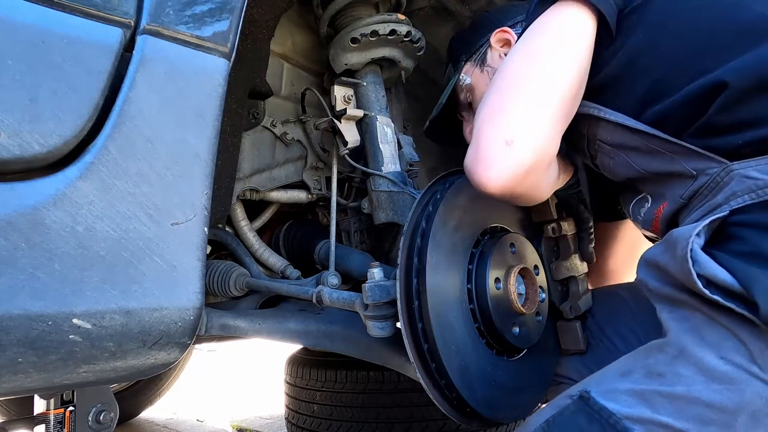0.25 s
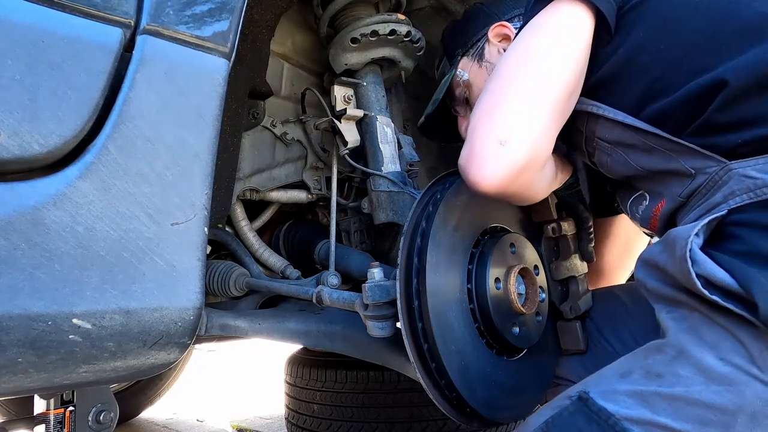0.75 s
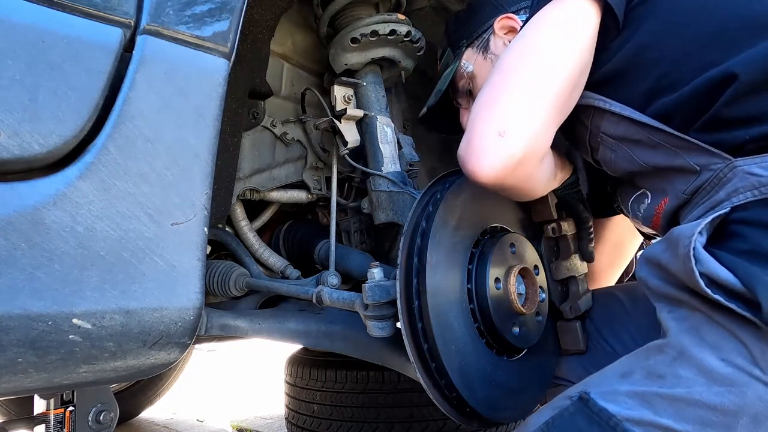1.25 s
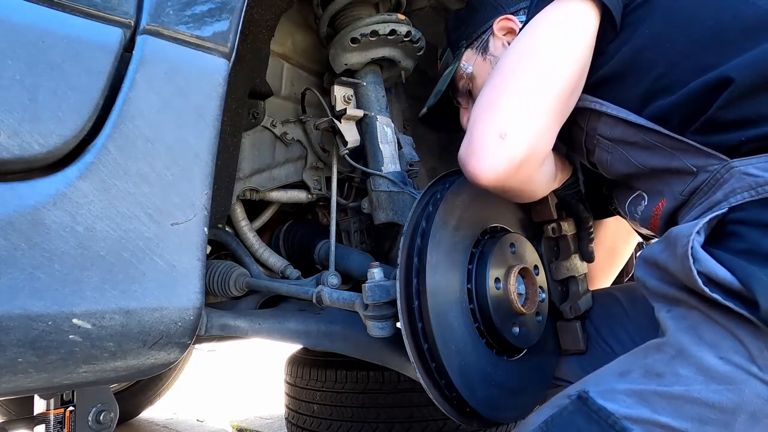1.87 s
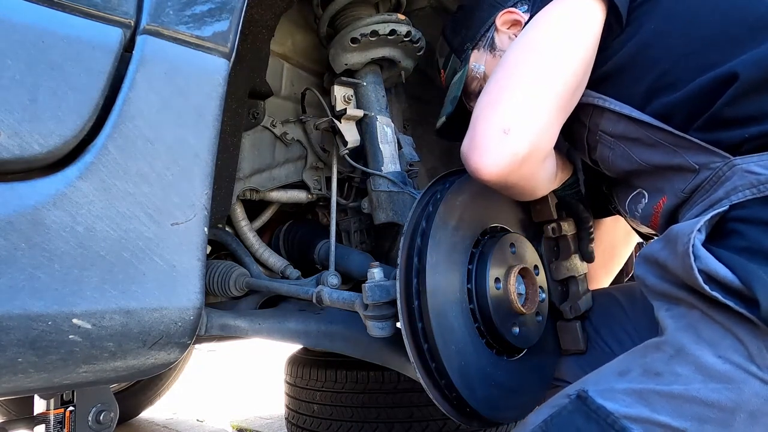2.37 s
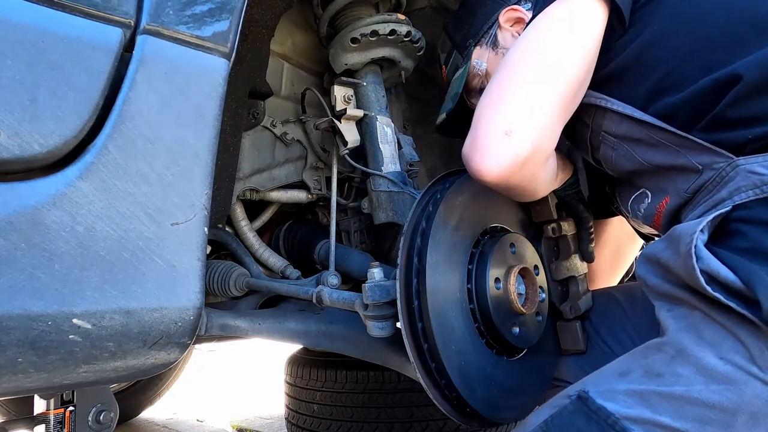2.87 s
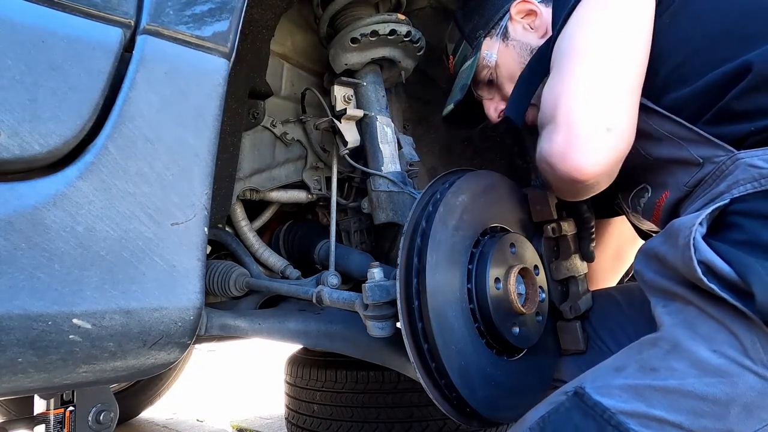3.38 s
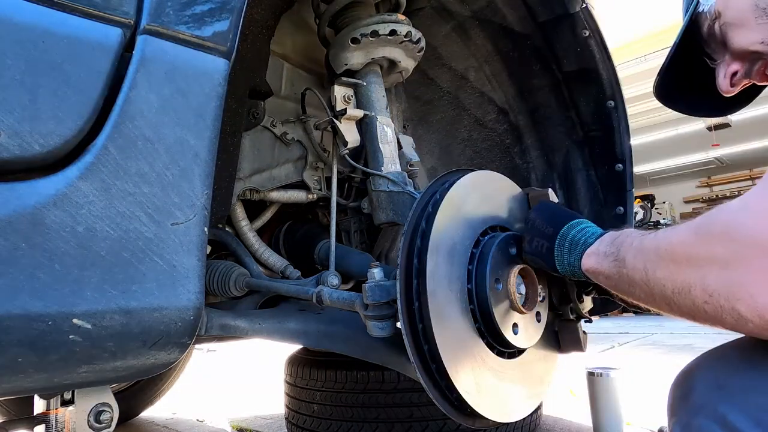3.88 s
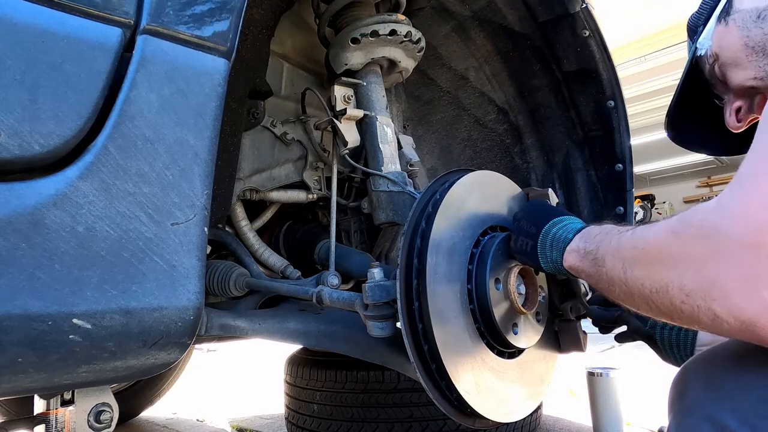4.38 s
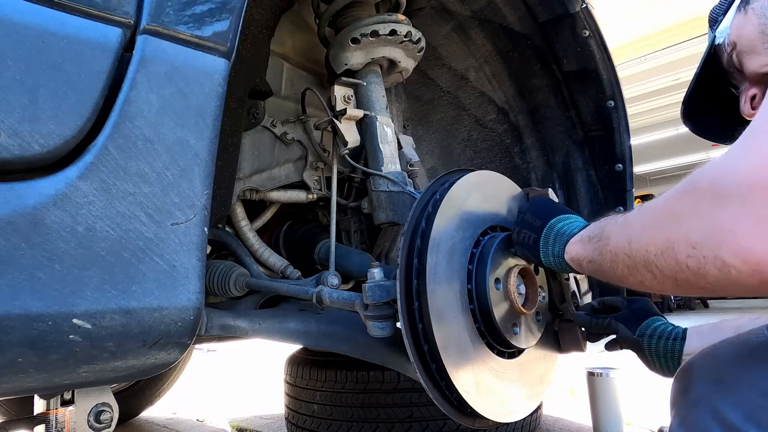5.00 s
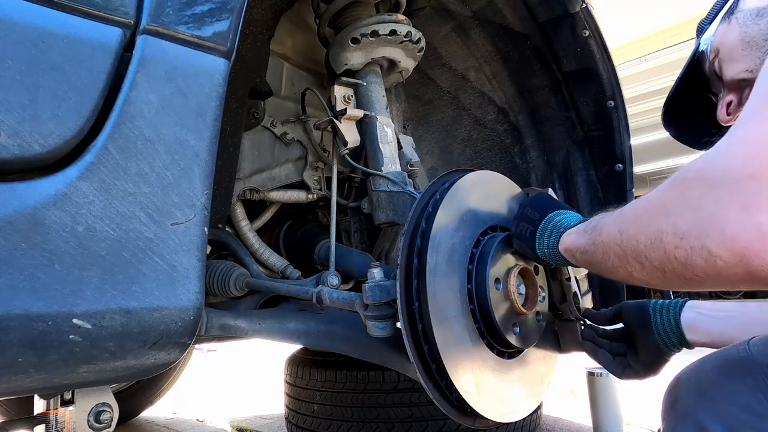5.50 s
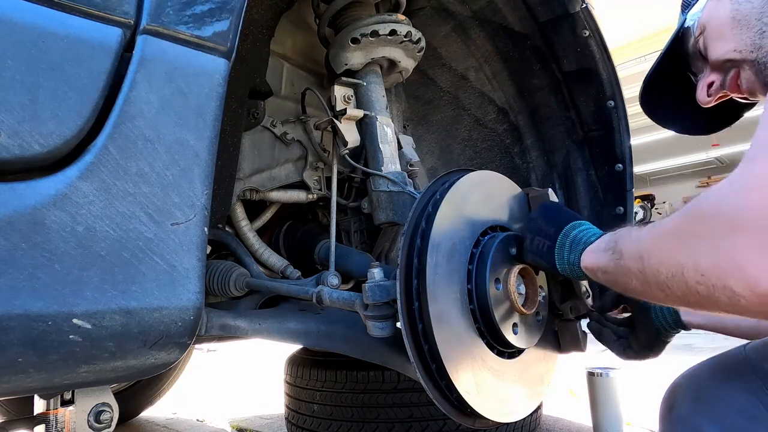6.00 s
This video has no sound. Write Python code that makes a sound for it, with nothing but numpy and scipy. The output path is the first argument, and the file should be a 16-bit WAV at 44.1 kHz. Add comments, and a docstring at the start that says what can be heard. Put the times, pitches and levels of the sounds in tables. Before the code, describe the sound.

Steel parts clink and scrape behind a car's brake rotor in a quiet garage, then a pad clicks in and a spring clip snaps.

```python
"""Work on a front brake

In an open garage steel parts scrape and clink behind a brake rotor: each contact adds a noise burst and ringing
disc and caliper modes. The scene jumps ahead: a pad clicks into its bracket and a spring clip snaps, again as
noise bursts with ringing modes beside them. Gloves rub and grit ticks, as shaped noise. Room tone, a brief drone,
a draught and a distant rush, like passing traffic that swells and recedes, are coloured noise with moving levels."""
import sys
import numpy as np
from scipy.fft import rfft, irfft, next_fast_len
from scipy.io import wavfile
from scipy.ndimage import map_coordinates

SR = 44100
rng = np.random.default_rng(int(sys.argv[2]) if len(sys.argv) > 2 else 0)


def store_pcm(level_fs):
    """Save levels as 16-bit WAV."""
    pcm = np.round(np.clip(level_fs, -1, 1) * 32767).astype(np.int16)
    wavfile.write(sys.argv[1], SR, np.atleast_2d(pcm).T)


N = 275184

# Background noise spectra: (frequency [Hz], relative density [dB])
ROOM_SPECTRUM = [(25, 0), (60, -6.5), (110, -6.5), (200, -10.5), (350, -17.5), (600, -20), (1000, -22),
                 (1600, -25), (2500, -27.5), (4000, -28.5), (7000, -31), (12500, -34.5), (16000, -35.5)]
DRONE_SPECTRUM = [(60, -58), (84, 5), (96, 0.5), (125, -25), (180, -20.5), (260, -16.5), (500, -61),
                  (1500, -74)]
DRAUGHT_SPECTRUM = [(1, -6), (2.5, 1), (7, -1), (12, -18), (20, -34), (35, -45), (80, -80), (200, -120)]
TRAFFIC_SPECTRUM = [(24, -31), (40, -4.5), (119, 1), (293, -4), (393, -9.5), (538, -6.5), (637, -6.5),
                    (854, -8), (1120, -15), (1710, -15.5), (2490, -23.5), (4470, -33), (6000, -33.5),
                    (7800, -47), (13200, -120)]
# Strength of the draught: (time [s], level [dB])
DRAUGHT_LEVEL = [(0, -31.5), (.8, -49.5), (1.2, -29.5), (2.4, -31.5), (2.7, -42), (3.8, -45), (4.5, -32),
                 (5.1, -46.5), (6.24, -42.5)]
# Sleeves and gloves rubbing: (time [s], level [dB], half length [s])
RUBS = [(0.015, -56, 0.081), (4.005, -59.5, 0.091), (4.52, -62.5, 0.061), (5.13, -56, 0.025),
        (5.45, -68.5, 0.075), (5.877, -62, 0.075)]
# Spectrum of the rubbing: (frequency [Hz], relative density [dB])
RUB_SPECTRUM = [(150, 5), (600, -3.0), (2000, -3.5), (6000, -10.5), (10000, -13.5), (16000, -23)]
# Dry ticks of gloves and grit: (time [s], nominal peak [dB], pitch [Hz])
TICKS = [(0.017, -43, 6140), (0.0637, -45.5, 4020), (4.218, -43.5, 8400), (4.442, -45, 5330),
         (4.8198, -46.5, 6660), (5.0182, -46, 6900), (5.063, -47.5, 9530), (5.1264, -33, 6330),
         (5.1617, -42.5, 5840), (5.213, -46, 10300), (5.3317, -48, 6300), (6.198, -52, 5800)]
# Pad against its bracket: (time [s], level before the pad's trim [dB], scrape-in time constant [s],
# clip ring [dB], knock [dB], edge [dB], favoured pitch [Hz])
PAD_HITS = [(3.9, -59.5, 0.001, 5, -12, -1, 4030), (3.947, -55, 0.017, -1, 1, -0.5, 2270),
            (3.985, -57, 0.014, -6, 26, 6, 3530), (4.265, -62, 0.025, -6, 0, -9, 2410),
            (4.539, -42, 0.0015, -7, 10, 0.5, 3200), (4.566, -52, 0.0056, -16, 10, -9, 1870),
            (4.67, -48, 0.0005, -3, 10, -3.5, 3250), (5.844, -44.5, 0.0013, -27, 6.5, 5.5, 9400),
            (5.881, -52.5, 0.0005, -20, 7, 4.5, 3760), (5.978, -45, 0.0012, -4.5, -1.5, -1, 2200),
            (6.077, -49, 0.007, 0, 6, 6, 5000), (6.104, -52, 0.037, -6, 11, -3, 1270),
            (6.13, -45, 0.0016, -7, 3, -6, 4500)]
# Contacts behind the rotor: (time [s], level before the rotor's trim [dB], scrape-in time constant [s],
# disc ring [dB], knock [dB], edge [dB], favoured pitch [Hz])
ROTOR_HITS = [(0.357, -34, 0.00064, -14, -2.5, -3, 1700), (0.362, -37, 0.0012, -19, 0, 5.5, 3970),
              (0.43, -43, 0.0052, -17, 3, -5, 1780), (0.469, -38.5, 0.003, -18, 0.5, -8, 4560),
              (0.488, -38.5, 0.0035, -15, 2, -4, 4380), (0.498, -35.5, 0.0061, 4.5, -1.5, 7, 4580),
              (0.645, -48, 0.0056, -14, 10, 4, 3500), (0.657, -46, 0.0096, 1.5, -1, -5, 3600),
              (0.738, -55.5, 0.045, -17, 7.5, -0.5, 3530), (0.765, -50.5, 0.013, -3, 5.5, -5, 1880),
              (0.809, -44.5, 0.004, -14, 3, -5, 2870), (1.026, -51.5, 0.0084, -5, 14, 8.5, 6300),
              (1.193, -61, 0.005, 2, 25, 0, 1890), (1.465, -53, 0.016, 1.5, 13, 5.5, 1940),
              (1.638, -61, 0.0049, -3.5, 7, 3, 3430), (1.819, -53, 0.0041, -13, 16.5, 13, 1700),
              (1.829, -50.5, 0.0042, 3, 4, -3, 835), (2.153, -60, 0.004, 2, 19, -3, 1500),
              (2.213, -50, 0.012, 5, 10.5, 8, 3600), (2.365, -54, 0.0063, -15, 24.5, 6, 1330),
              (2.483, -47, 0.0015, 0.5, 6.5, 4, 5800), (2.586, -47, 0.0062, -0.5, 20, 9.5, 1350),
              (2.866, -45, 0.0029, 3, 10, 2.5, 2710), (2.91, -53, 0.01, 3.5, 14.5, 5.5, 1860),
              (2.936, -59, 0.014, -10, 23, 10, 1900), (3.083, -52, 0.0043, -2, 4, -4, 2650),
              (3.209, -43, 0.0024, 2, 17.5, 1.5, 2900), (3.256, -48.5, 0.024, 2, 8.5, 5, 1090),
              (3.388, -44, 0.0035, -0.5, -1.5, -6.5, 2760), (3.534, -49, 0.008, 2, 4, 2, 7000),
              (3.557, -29.5, 0.00094, 2.5, -6, 4, 2563), (3.567, -32.5, 0.00072, 7, -16, -20, 3760),
              (3.662, -55, 0.002, -9, 0, -11, 3580)]
# Dense short resonances of a contact: (frequency [Hz], relative density [dB])
PAD_CLATTER = [(300, -17), (1000, -19), (1900, -1), (3200, -2.5), (4000, -1.5), (5000, 0), (6500, -6.5),
               (9500, -10.5), (11500, -12), (16000, -23)]
ROTOR_CLATTER = [(150, -26), (300, -21.5), (650, -16.5), (900, -11.5), (1550, -12.5), (1850, -7.5),
                 (2700, -8), (3800, -8), (4400, -9.5), (6000, -11), (9000, -15), (10700, -28), (12800, -23),
                 (16000, -45)]
# Extra colour of the garage's answer: (frequency [Hz], gain [dB])
ECHO_COLOUR = [(1000, 3.5), (4000, -6.5), (10000, -19)]
# (frequency [Hz], relative level [dB], time to fall 60 dB [s])
SPRING_MODES = [(5378, 0, .035), (5700, -10, .04), (8086, -5, .04), (9180, -13, .035), (13480, -23, .06)]
CLIP_MODES = [(3160, -10, .14), (4570, -7, .1), (4883, -2, .15), (5050, -6, .12), (5276, -2, .2),
              (5378, 0, .17), (6272, -6, .13), (7400, -13, .1), (8500, -11, .09), (9500, -13, .07),
              (10450, -13, .07)]
PAD_MODES = [(1890, -4, .1), (1965, -2, .22), (2430, -14, .2), (2832, -9, .2), (2980, -9, .12),
             (3095, -6, .2), (3160, -3, .15), (3230, -5, .1), (3316, -8, .2), (3930, -10, .1),
             (4883, -6, .18), (5270, -5, .18), (5780, -11, .08)]
DISC_MODES = [(880, -14, .22), (955, -22, .8), (1140, -12, .25), (1264, -10, .3), (1404, -16, .23),
              (1896, -12, .28), (2243, -16, .2), (2456, -11, .25), (2588, -4, .27), (2709, -10, .17),
              (2826, -3, .17), (2961, -9, .15), (3194, -9, .17), (3315, 1, .2), (3389, -11, .14),
              (3588, -2, .37), (3775, -4, .23), (4517, -14, .18), (4840, -11, .22), (4895, -13, .25),
              (5370, -13, .17), (5665, -11, .15), (5779, -11, .14), (6119, -13, .13), (6263, -11, .11),
              (6881, -16, .11), (7395, -12, .11), (8644, -14, .1), (8915, -18, .1), (12920, -22, .07)]
CALIPER_MODES = [(958, -15, .4), (1114, -15, .2), (1354, -12, .2), (1513, -15, .2), (1700, -14, .2),
                 (1825, -7, .2), (2225, -6, .2), (2355, -13, .25), (2589, 0, .25), (2690, -4, .18),
                 (2828, -4, .17), (3195, -2, .18), (3315, -6, .19), (3527, -4, .15), (3588, -4, .33),
                 (3783, -1, .19), (3857, -2, .17), (3989, -1, .16), (4253, -7, .18), (4671, -7, .3),
                 (4846, -6, .2), (5138, -6, .2), (5210, -7, .17), (5490, -8, .18), (5671, -4, .15),
                 (5790, -9, .15), (6122, -3, .13), (7428, -6, .15), (8059, -11, .1), (9335, -10, .09)]

JUMP_S = 3.716  # the scene jumps from rotor to pad
SNAP_S = 4.0267  # the spring clip lets go
TOP_HZ = 15850  # upper band limit
CLANK_SHARE = .58  # how much of a knock's lift, in dB, reaches the middle of the ring
EDGE_REACH = 1.3  # a sharp edge lifts the very top more than the treble


def amp(db):
    """Logarithmic level: decibels to amplitude gain."""
    return 10 ** (np.asarray(db) / 20)


def unit(x):
    """Power normalisation: scale to rms 1."""
    return x / np.sqrt(np.mean(x ** 2) + 1e-20)


def clock(size):
    """Uniform sampling: the time of each sample [s]."""
    return np.arange(size) / SR


def curve(rows):
    """Linear interpolation: (time [s], value) rows joined by straight lines."""
    return np.interp(clock(N), *np.transpose(rows))


def filtered(x, response):
    """Linear filtering: multiply the spectrum by a gain that depends on frequency."""
    padded = next_fast_len(len(x) + SR // 10)
    hz = np.fft.rfftfreq(padded, 1 / SR)
    return irfft(rfft(x, padded) * response(hz), padded)[:len(x)]


def coloured(x, points):
    """Spectral shaping: gains [dB] joined along a logarithmic frequency axis."""
    f, db = np.transpose(points)
    return filtered(x, lambda hz: amp(np.interp(np.log(hz + 1), np.log(f), db)))


def noise(points, size):
    """Coloured noise: white Gaussian noise through a spectrum, rms 1."""
    return unit(coloured(rng.standard_normal(size), points))


def wobble(rate, size):
    """Random modulation: a smooth curve through `rate` Gaussian knots a second."""
    knots = rng.standard_normal(int(size * rate / SR) + 4)
    return map_coordinates(knots, [clock(size) * rate])


def strewn(span, db, spread_db, hz, count):
    """Stratified random timing: (s, dB, Hz) events over a span, within half an octave of one pitch."""
    when, force, octave = rng.random((count, 3)).T
    times = span[0] + (span[1] - span[0]) * (np.arange(count) + when) / count
    levels = db + spread_db * (2 * force - 1)
    pitches = hz * 2 ** (octave - .5)
    return list(zip(times, levels, pitches))


def ringing(modes, t, blows, scatter_db, split_hz):
    """Modal superposition: decaying, beating mode pairs; one row per blow, nominal rms 1 at t = 0."""
    hz, db, t60 = np.tile(np.transpose(modes), 2)[:, :, None]
    hz = hz + split_hz * rng.standard_normal(hz.shape)
    decay = amp(-60 * np.maximum(t, 0) / t60)
    waves = decay * np.exp(2j * np.pi * hz * t)
    # each blow shares its force out anew
    gain = amp(db.T + scatter_db * rng.standard_normal((blows, len(hz))))
    gain[:, len(modes):] *= .5  # the partner is the weaker of the pair
    force = gain * np.exp(2j * np.pi * rng.random(gain.shape))
    rms = np.sqrt(np.sum(gain ** 2, axis=1, keepdims=True) / 2)
    return (force @ waves).real / rms


def clatter(spectrum, t, t60, treble_t60, echo_db, echo_t60):
    """High modal density: crowded resonances act as decaying noise, with a faint answer from the garage."""
    dense, age = noise(spectrum, len(t)), np.maximum(t, 0)
    low = filtered(dense, lambda hz: 1 / (1 + (hz / 5000) ** 4))
    treble = dense - low
    answer = unit(coloured(noise(spectrum, len(t)), ECHO_COLOUR))
    echo = amp(echo_db - 60 * age / echo_t60) * answer
    return low * amp(-60 * age / t60) + treble * amp(-60 * age / treble_t60) + echo


def contacts(hits, parts, body, held_db, damping_db_per_s, crack_db, crack_t60, chatter_db,
             scatter_db, split_hz, favour_db, dulling):
    """Friction and impact: steel slides in with growing chatter, cracks, and both parts ring out."""
    lead = SR // 8  # room for the slide before the crack
    t = clock(SR * 5 // 8) - lead / SR
    rings = [ringing(modes, t, len(hits), scatter_db, split_hz) for modes in parts]
    hardest_db = max(hit[1] for hit in hits)
    out = np.zeros(N + SR)
    for (s, db, scrape, struck_db, knock_db, edge_db, pitch), struck, held in zip(hits, *rings):
        slide = np.exp(np.minimum(t, 0) / max(scrape, 1e-4))
        chatter = unit(amp(chatter_db * wobble(449.6, len(t))))
        crack = 1 + amp(crack_db - 60 * np.abs(t) / crack_t60)
        # the later the blow, the weaker the held part's share, as its grip tightens
        held_gain = amp(held_db - damping_db_per_s * (s - hits[0][0]))
        ring = amp(struck_db) * struck + held_gain * held
        blow = slide * (body(t) * chatter * crack + ring)
        # a softer blow stays in contact longer and loses its top
        top_db = EDGE_REACH * edge_db - dulling * (hardest_db - db)
        blow = coloured(blow, [(1100, knock_db), (2300, CLANK_SHARE * knock_db), (3700, 0.012),
                               (6200, edge_db), (11000, top_db)])
        # the spot that is struck favours the modes near one pitch
        width_hz = 60 + .025 * pitch
        blow = filtered(blow, lambda hz: amp(favour_db * np.exp(-.5 * ((hz - pitch) / width_hz) ** 2)))
        strength = np.sqrt(np.mean(blow[lead:lead + SR // 90] ** 2))  # rms just after the crack
        out[round(s * SR):][:len(t)] += amp(db) * blow / strength
    return out[lead:lead + N]


def room_tone():
    """Stationary noise: steady room tone that wavers very slightly."""
    return amp(-62.0) * noise(ROOM_SPECTRUM, N) * amp(0.073 * wobble(2.9, N))


def drone():
    """Exponential decay: a low drone holds briefly, then dies away."""
    hold_s, fade_db_per_s = .1, 34
    fade_db = fade_db_per_s * np.maximum(clock(N) - hold_s, 0)
    return amp(-55.5 - fade_db) * noise(DRONE_SPECTRUM, N)


def draught():
    """Turbulent pressure: a draught on the microphone gives very low noise of changing strength."""
    return amp(curve(DRAUGHT_LEVEL)) * noise(DRAUGHT_SPECTRUM, N)


def traffic():
    """Inverse distance law: a far rush swells as it nears, its low rumble wavering on its own."""
    nearest_s, pass_s = 5.67, 0.8  # time when nearest; time from there to half the power [s]
    t = clock(N)
    rush = noise(TRAFFIC_SPECTRUM, N)
    low = filtered(rush, lambda hz: 1 / (1 + (hz / 400) ** 4))
    rumble = low * amp(.8 * wobble(5.5, N))
    distance = np.hypot(1, (t - nearest_s) / pass_s)  # 1 when nearest
    level = amp(-54 + 1.1 * wobble(11, N)) / distance
    return level * (rush - low + rumble) * (t > JUMP_S)


def grit():
    """Impulsive excitation: each dry tick is noise around one pitch with a fast and a slow decay."""
    t, out = clock(SR // 12), np.zeros(N + SR)
    # more dry ticks, strewn at random while the pad is pressed home
    pressing = strewn((4.7, 5.3), db=-47, spread_db=2, hz=6660, count=5)
    for s, db, hz in TICKS + pressing:
        tick = noise([(500, -15), (0.72 * hz, -10), (hz, 0), (1.4 * hz, -8.3), (1.401 * hz, -18)], len(t))
        decay = amp(-60 * t / 0.0081) + amp(-10 - 60 * t / 0.078)
        out[round(s * SR):][:len(t)] += amp(db - 9) * tick * decay  # 9 dB allows for the noise's peaks
    return out[:N]


def gloves():
    """Friction noise: rubber and cloth rub softly under swelling pressure."""
    pressure = sum(amp(db) * np.exp(-.5 * ((clock(N) - s) / half) ** 2) for s, db, half in RUBS)
    rub = noise(RUB_SPECTRUM, N)
    return pressure * unit(rub * amp(4.3 * wobble(300, N)))


def spring():
    t = clock(SR // 3)
    slip = amp(-35.0) * clatter(PAD_CLATTER, t, t60=0.034, treble_t60=0.06, echo_db=-25, echo_t60=0.36)
    age = t - .0022
    ping = amp(-29) * ringing(SPRING_MODES, age, blows=1, scatter_db=.5, split_hz=3)[0]
    after = amp(-45.5) * ringing(CLIP_MODES, age, blows=1, scatter_db=0.5, split_hz=6.9)[0]
    out = np.zeros(N)
    out[round(SNAP_S * SR):][:len(t)] = slip + (ping + after) * (age > 0)
    return out


def pad():
    """Damped impact: the hand-held pad clicks on the near side and rings less as it seats."""
    def body(t):
        """Short diffuse decay: the clatter of pad and bracket."""
        return clatter(PAD_CLATTER, t, t60=0.071, treble_t60=0.062, echo_db=-10.5, echo_t60=0.14)

    trim_db = -3
    return amp(trim_db) * contacts(
        PAD_HITS, (CLIP_MODES, PAD_MODES), body, held_db=0, damping_db_per_s=2.5,
        crack_db=6.5, crack_t60=0.096, chatter_db=5.0,
        scatter_db=3.5, split_hz=14.4, favour_db=12.0, dulling=.1)


def rotor():
    """Modal ringing: parts knock deep in the wheel well, and disc and caliper modes ring with each knock."""
    def body(t):
        """Long diffuse decay: the clatter inside the wheel well."""
        return clatter(ROTOR_CLATTER, t, t60=0.17, treble_t60=0.094, echo_db=-20, echo_t60=0.77)

    # faint touches as the fingers feel their way
    scrape_s, disc_db, knock_db, edge_db = 0.02, 0, 14.5, -2
    fumbles = strewn((1.85, 2.08), db=-63, spread_db=2, hz=1960, count=2)
    touches = [(s, db, scrape_s, disc_db, knock_db, edge_db, hz) for s, db, hz in fumbles]
    trim_db = -1.06
    return amp(trim_db) * contacts(
        ROTOR_HITS + touches, (DISC_MODES, CALIPER_MODES), body, held_db=3, damping_db_per_s=3.5,
        crack_db=-6.5, crack_t60=0.28, chatter_db=1.0,
        scatter_db=4.5, split_hz=4.1, favour_db=6.5, dulling=0.42)


def scene():
    """Superposition: all sources add; the rotor's ring stops dead where the scene jumps ahead."""
    background = room_tone() + drone() + draught() + traffic()
    hands = grit() + gloves()
    brake = spring() + pad() + rotor() * (clock(N) < JUMP_S)
    return (background + hands + brake)[None]


def record(dry):
    """Band limitation: nothing at or above the top frequency remains."""
    return np.array([filtered(channel, lambda hz: hz < TOP_HZ) for channel in dry])


dry = scene()
out = record(dry)
store_pcm(out)
```